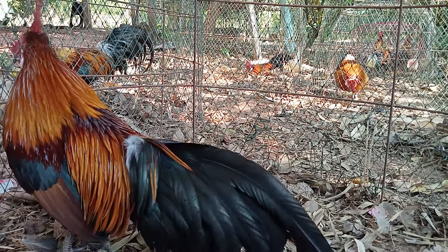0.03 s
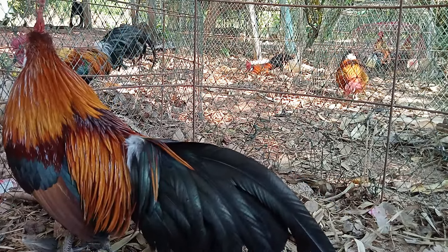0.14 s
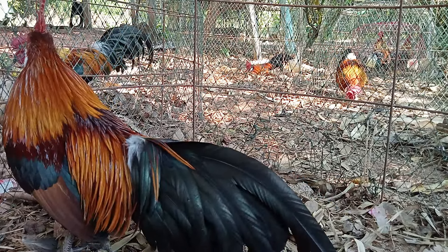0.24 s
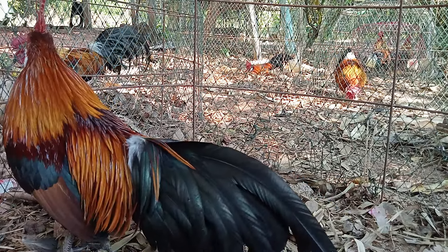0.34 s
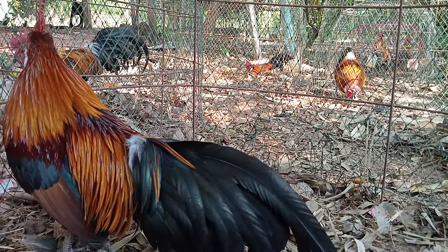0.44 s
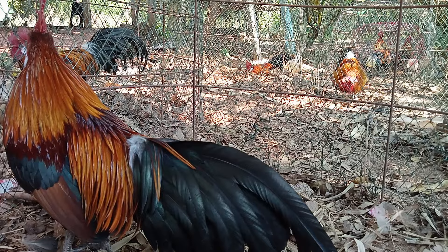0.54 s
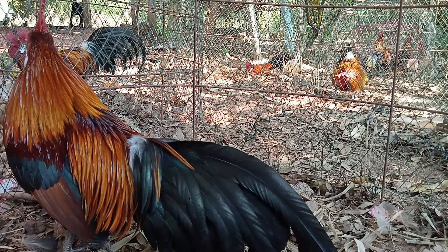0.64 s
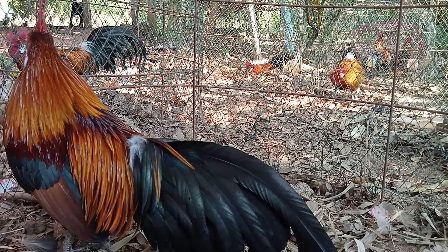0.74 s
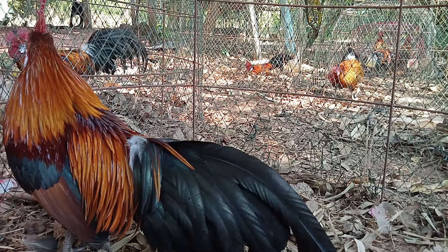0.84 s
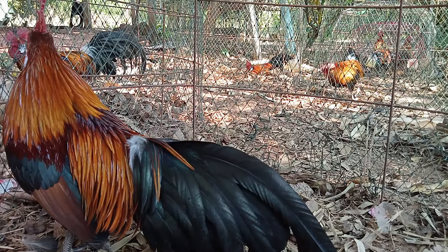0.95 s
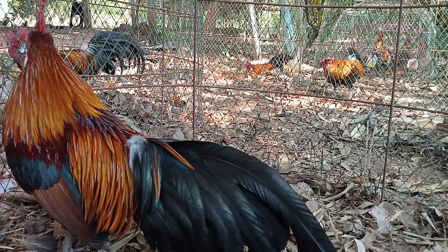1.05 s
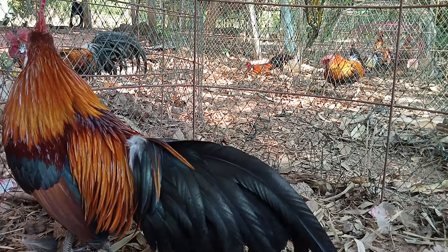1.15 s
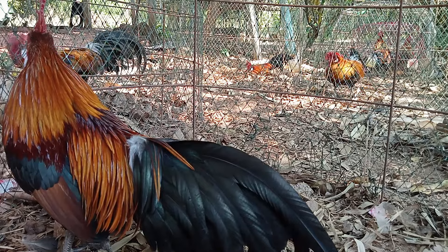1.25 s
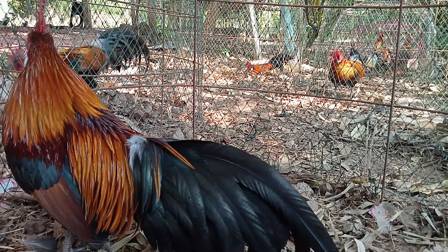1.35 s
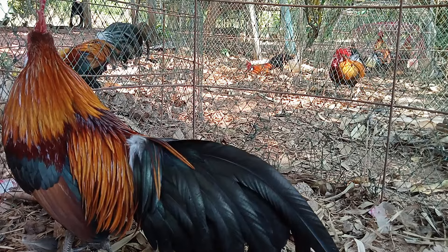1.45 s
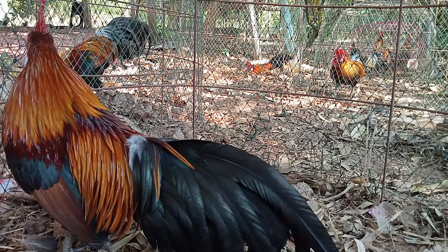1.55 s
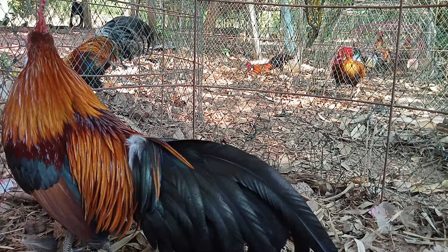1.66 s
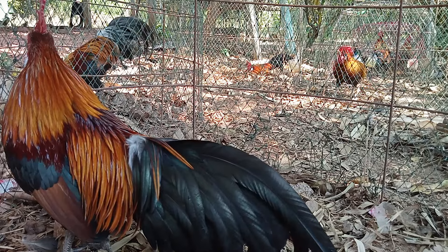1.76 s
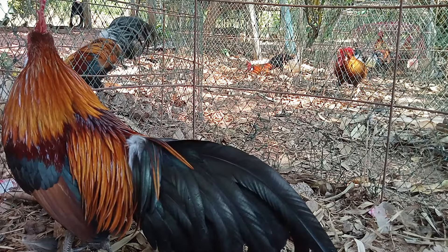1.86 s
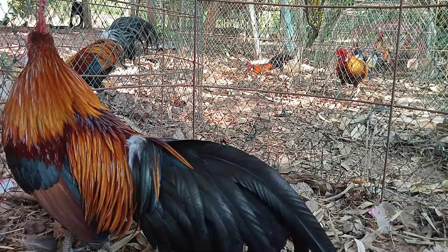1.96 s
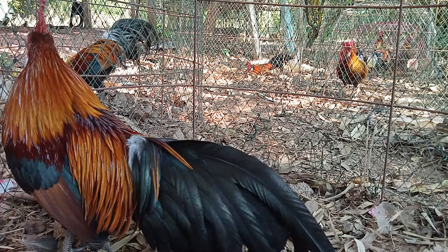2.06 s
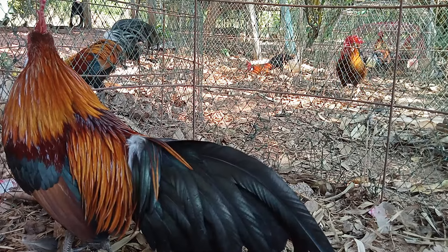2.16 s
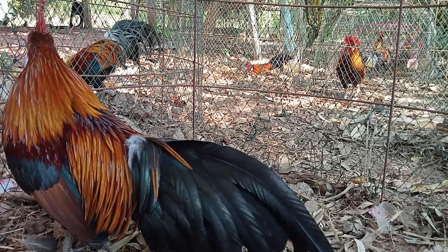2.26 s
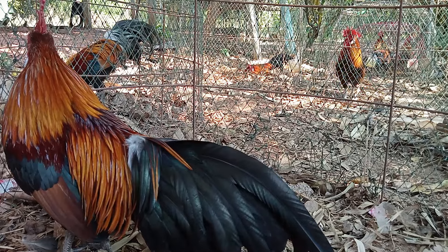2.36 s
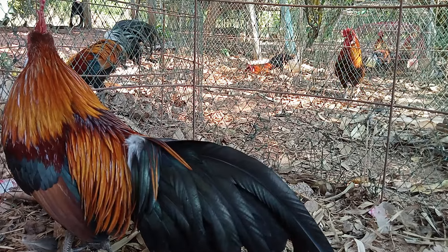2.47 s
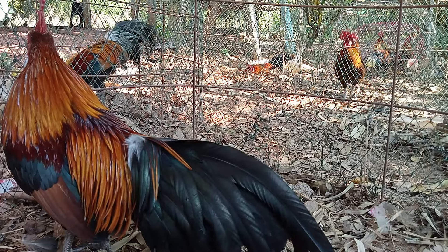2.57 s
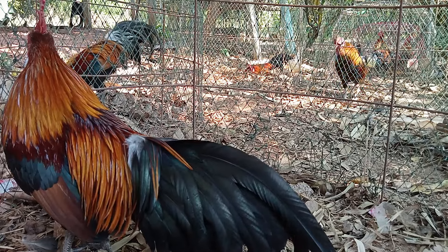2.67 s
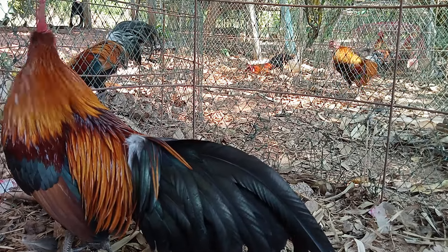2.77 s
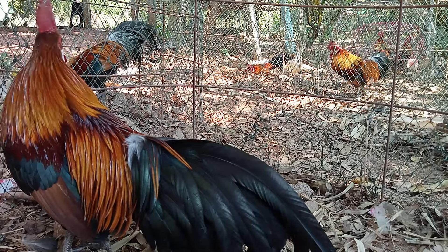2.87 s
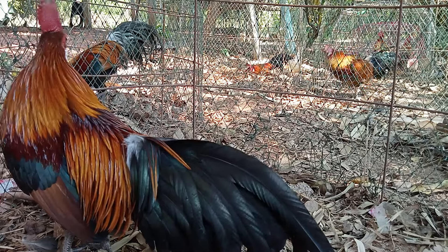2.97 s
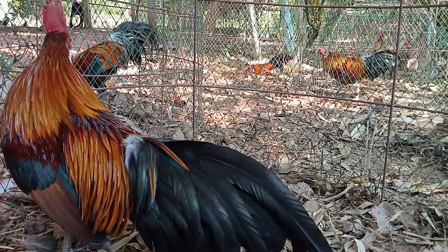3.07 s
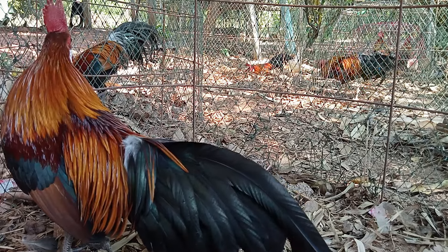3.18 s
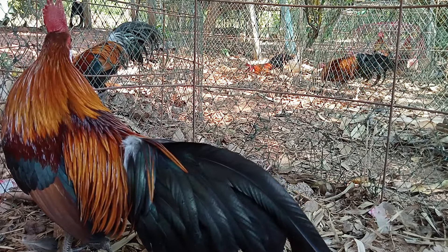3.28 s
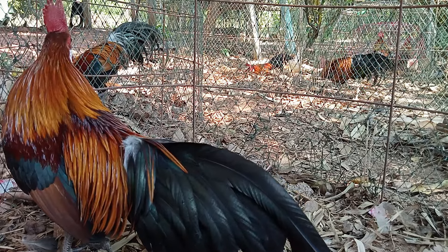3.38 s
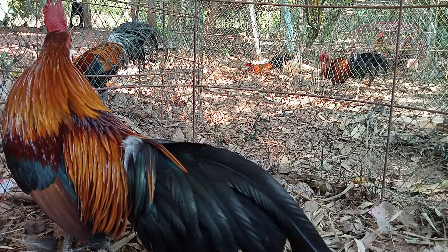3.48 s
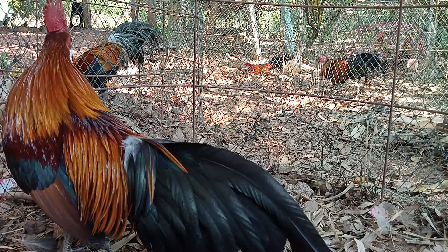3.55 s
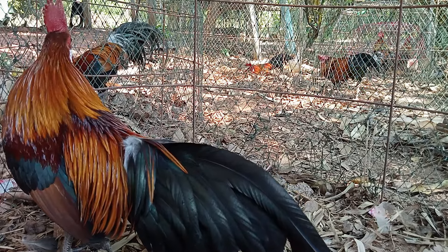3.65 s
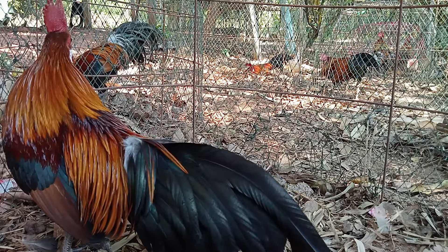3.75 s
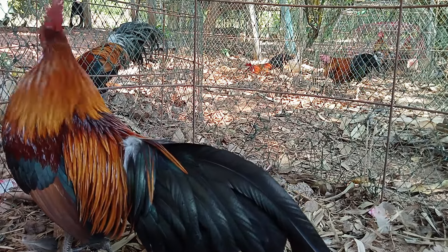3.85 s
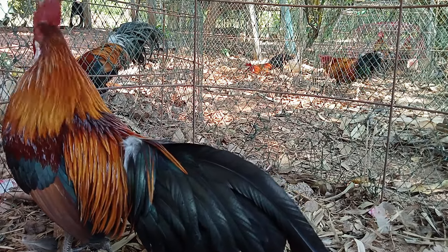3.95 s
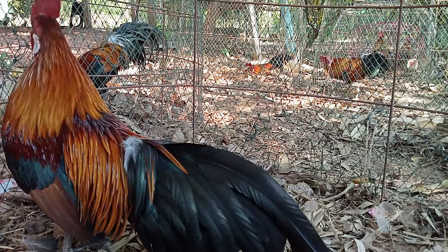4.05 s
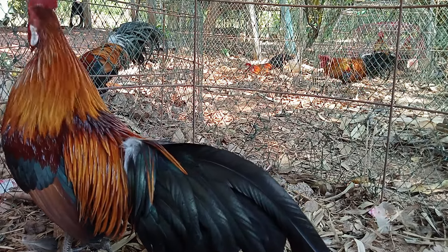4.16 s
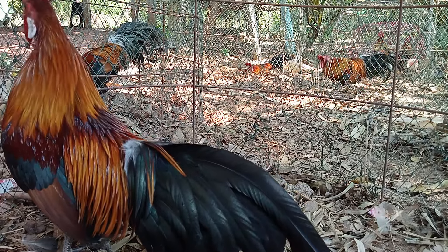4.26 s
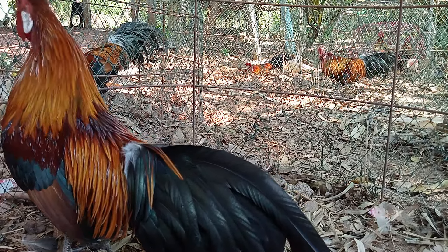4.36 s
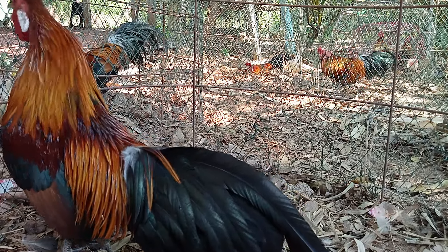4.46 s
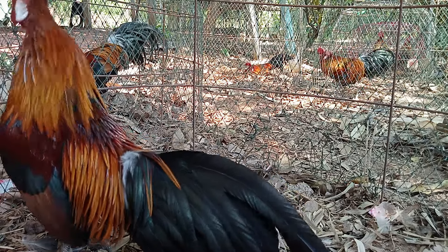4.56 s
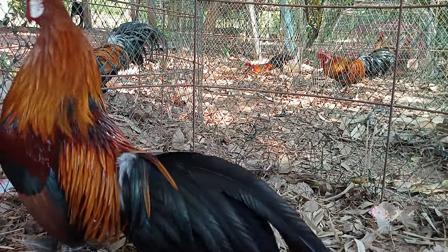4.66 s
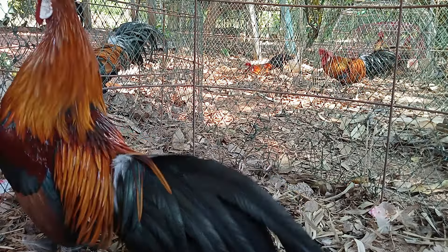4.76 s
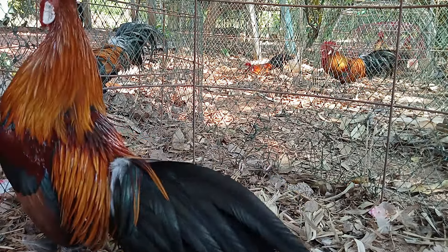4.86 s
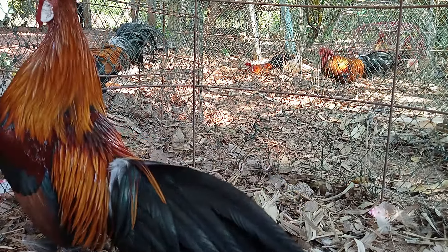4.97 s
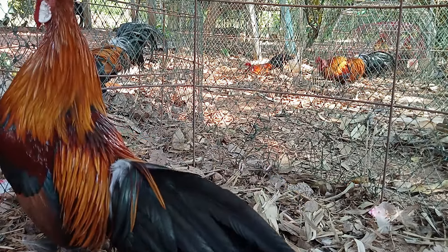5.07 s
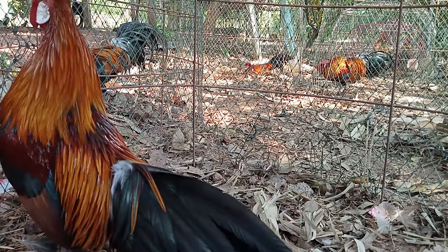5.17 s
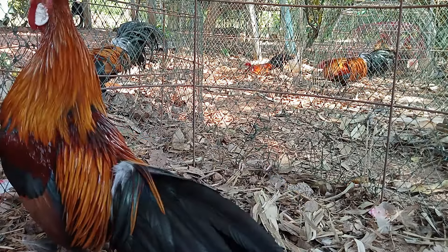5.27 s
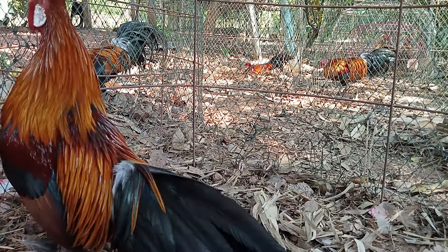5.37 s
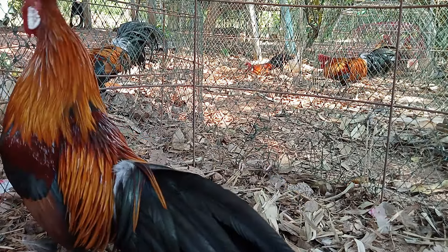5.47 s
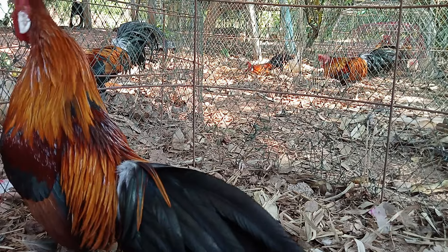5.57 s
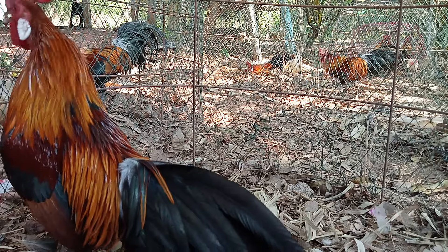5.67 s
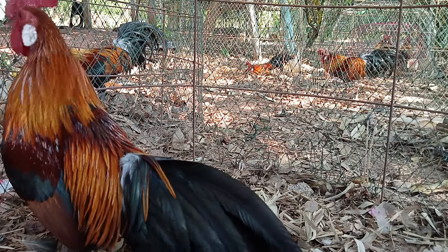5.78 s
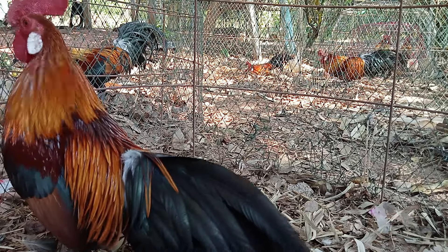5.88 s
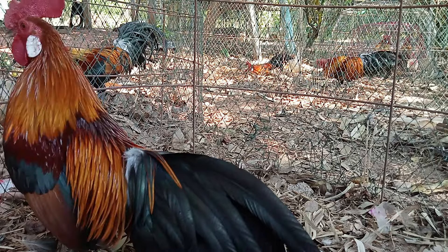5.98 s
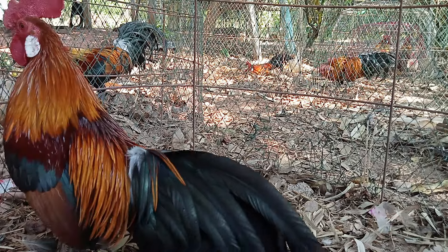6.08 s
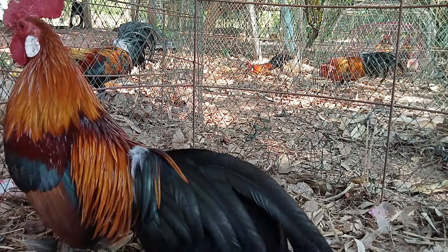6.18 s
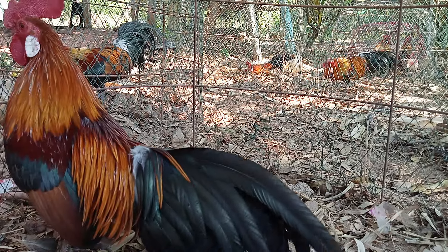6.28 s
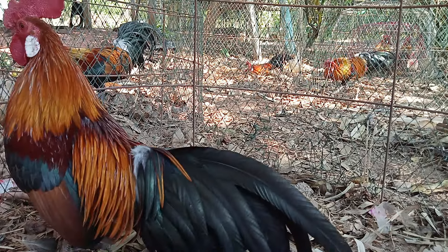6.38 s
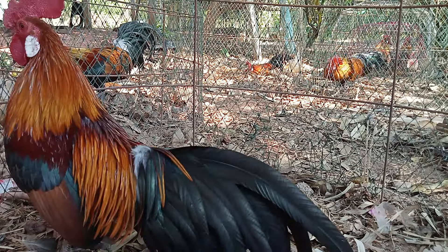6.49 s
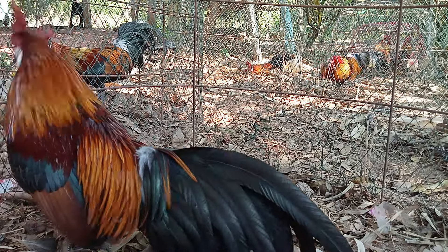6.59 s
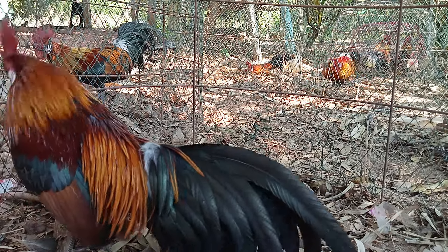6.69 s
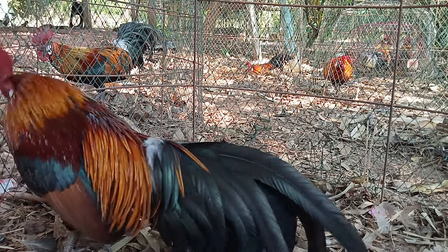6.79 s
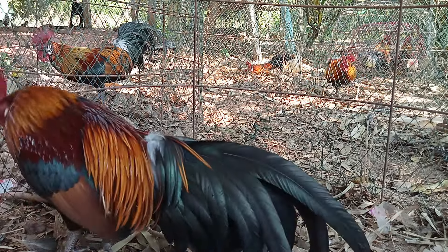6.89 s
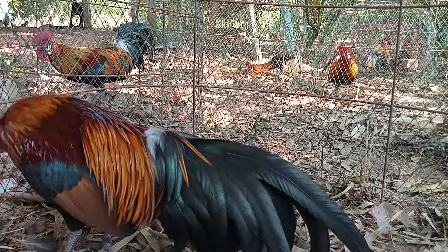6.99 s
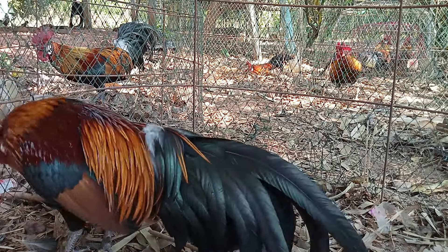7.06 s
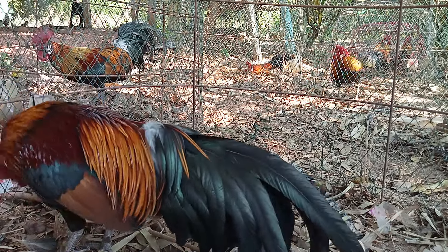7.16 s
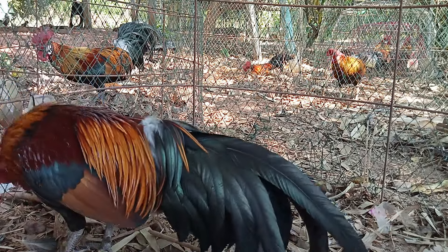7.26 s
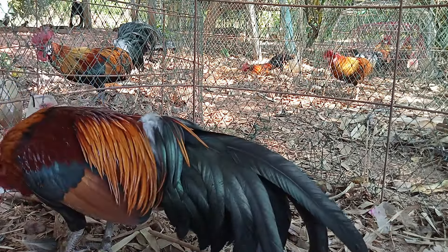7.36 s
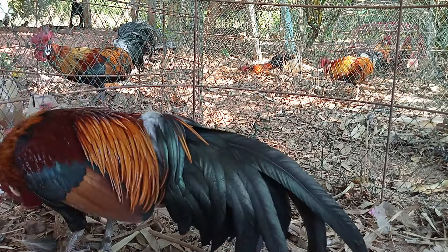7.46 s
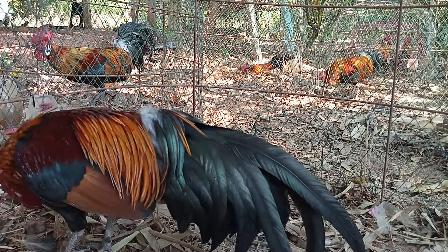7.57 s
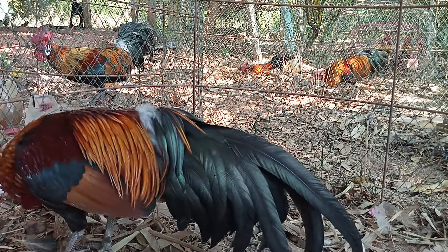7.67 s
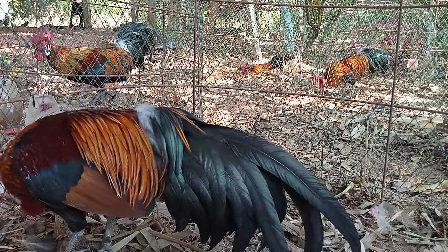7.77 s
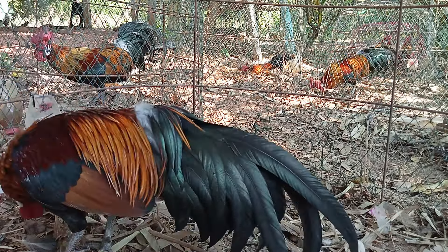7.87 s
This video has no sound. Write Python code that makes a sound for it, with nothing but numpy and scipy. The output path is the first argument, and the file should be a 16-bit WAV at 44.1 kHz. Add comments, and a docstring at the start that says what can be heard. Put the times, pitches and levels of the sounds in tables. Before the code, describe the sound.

Low throaty clucks quicken before one harsh, close rooster crow, followed by a rattling growl, with insects buzzing and wild birds whistling behind.

```python
"""A wire pen under trees: a rooster crows once, close by, as two wavering membranes and a rasp in a moving throat.
Around it other roosters cluck, moan and growl softly, as voiced notes shaped by throat resonances.
Further off wild birds whistle in pure glides and chatter in pulsed notes; insects, as coloured noise,
buzz steadily near 7 kHz. Dry leaves crack in short bursts, and light air bumps the microphone."""
import sys
import numpy as np
from scipy import signal
from scipy.fft import rfft, irfft, next_fast_len
from scipy.io import wavfile
from scipy.ndimage import uniform_filter1d

SR = 44100
rng = np.random.default_rng(int(sys.argv[2]) if len(sys.argv) > 2 else 0)


def unload_audio(sound):
    """Save the sound as a 16-bit wav file, at the path given as the first command line argument."""
    columns = np.transpose(np.atleast_2d(sound))
    # keep every value between -1 and 1, then stretch to whole-number steps
    steps = np.round(np.clip(columns, -1, 1) * 32767)
    wavfile.write(sys.argv[1], SR, steps.astype(np.int16))


N = 349713
TIME = np.arange(N) / SR


def undb(db):
    """Decibels to amplitude gain."""
    return 10 ** (np.asarray(db) / 20)


def curves(table):
    """Each column after the time column, as a control line through time."""
    times_s, *columns = np.transpose(table)
    return [np.interp(TIME, times_s, column) for column in columns]


def gate(table, fade_s):
    """Open from the first row of a table to its last, with straight fades."""
    inside_s = np.minimum(TIME - table[0][0], table[-1][0] - TIME)
    return np.clip(inside_s / fade_s + .5, 0, 1)


def unit(x):
    """Scale to rms 1."""
    return x / np.sqrt(np.mean(x ** 2) + 1e-18)


def even(x, size):
    """Hold the short-term rms near 1; size is the averaging length in samples."""
    power = uniform_filter1d(uniform_filter1d(x ** 2, size), size)
    return x / np.sqrt(np.abs(power) + 1e-12)


def colour(x, spectrum):
    """Filter by a (pitch_hz, level_db) spectrum that falls away past its ends."""
    hz, db = np.transpose(spectrum)
    size = next_fast_len(len(x))
    f = np.arange(size // 2 + 1) * SR / size + 1
    gain = undb(np.interp(np.log(f), np.log(hz), db))
    gain = gain / np.hypot(1, (.7 * hz[0] / f) ** 4)
    gain = gain / np.hypot(1, (f / hz[-1] * .7) ** 4)
    return irfft(rfft(x, size) * gain, size)[:len(x)]


def band(x, lo_hz, hi_hz, order=2):
    """Band-pass; order 1 is a single resonance."""
    edges_hz = [max(lo_hz, 10), min(hi_hz, SR * .45)]
    return signal.sosfilt(signal.butter(order, edges_hz, "band", fs=SR, output="sos"), x)


def walk(rate_hz, size=N):
    """Smooth chance: random points, rate_hz of them a second, joined by straight lines."""
    steps = np.arange(size) * rate_hz / SR
    count = int(steps[-1]) + 2
    return 1.2 * np.interp(steps, np.arange(count), rng.standard_normal(count))


def pulses(hz, rough, jitter=0.36, scatter_db=4):
    """One push of air per cycle; roughness scatters their moments and sizes."""
    at = np.flatnonzero(np.diff(np.floor(np.cumsum(hz) / SR)))
    chance = rng.standard_normal((len(at), 2)).T * (rough * np.ones(len(hz)))[at]
    moved = np.clip(at + jitter * chance[0] * SR / hz[at], 0, len(hz) - 1).astype(int)
    return np.bincount(moved, undb(scatter_db * chance[1]), len(hz))


def add(track, start_s, sound):
    """Mix a sound into a track at a time."""
    i = max(int(start_s * SR), 0)
    track[i:i + len(sound)] += sound[:N - i]


def bursts(table, texture):
    """Rounded bursts, one per (start_s, length_s, level_db), opening onto a steady texture."""
    envelope = np.zeros(N)
    for start_s, length_s, level_db in table:
        add(envelope, start_s, undb(level_db) * np.sqrt(np.abs(np.hanning(int(length_s * SR)))))
    return envelope * unit(texture)


# still air under the trees, as the microphone hears it: pitch_hz, relative level_db
AIR_SPECTRUM = [(88, -42), (150, -10.5), (436, -6), (509, -4), (607, -3), (681, -5), (1980, -9.5),
                (5540, -8), (7130, -6.5), (10100, -27), (15500, -14)]
# insects all around: time_s, level_db (trimmed by insect_db)
INSECT_LEVELS = [(0, -48), (4.4, -49), (5.7, -49.5), (6.3, -52.5), (7.9, -54)]
# colour of the insect chorus: pitch_hz, relative level_db
INSECT_SPECTRUM = [(4500, -26), (5800, -10.5), (6600, -5), (7100, 0.5), (7700, -5.5), (8400, -15.5),
                   (10000, -22)]


def woodland(air_db=-51, insect_db=-2):
    """Still air and a chorus of insects are shaped noise; the insects have a fine flutter."""
    air = unit(colour(rng.standard_normal(N), AIR_SPECTRUM)) * undb(air_db + .5 * walk(3.83))
    buzz = unit(colour(rng.standard_normal(N), INSECT_SPECTRUM))
    flutter = undb(1.5 * walk(180) + .5 * walk(18))
    return air + buzz * flutter * undb(curves(INSECT_LEVELS)[0] + insect_db)


# air rumbling at the microphone: time_s, level_db (trimmed by rumble_db)
RUMBLE_LEVELS = [(.5, -60), (.9, -46.5), (1.7, -62), (3, -62.5), (3.7, -70.5), (4.8, -63.5), (5.2, -43),
                 (5.7, -46.5), (5.9, -39), (7, -44.5), (7.9, -56)]
# colour of that rumble: pitch_hz, relative level_db
RUMBLE_SPECTRUM = [(25, -63), (60, -1.5), (110, -2), (180, -11), (300, -16), (500, -73.5)]
# strongest bumps of air on the microphone: start_s, peak level_db (before ringing and bump_db), pitch_hz
AIR_BUMPS = [(0.122, -35, 80.5), (0.902, -21, 125), (1.132, -35, 100), (1.421, -27.5, 84),
             (2.248, -34.5, 105), (3.072, -42, 75), (4.269, -41, 74), (5.82, -15.5, 149.6),
             (5.955, -29, 83.3), (6.115, -17, 102), (6.15, -25, 106), (6.409, -27.5, 113),
             (6.618, -22.5, 96), (6.718, -28, 139), (6.88, -29, 98), (7.149, -29.5, 101)]


def buffeting(rumble_db=-3, bump_db=-1, rise_s=0.005, patchy_db=7):
    """Air eddies at the microphone: a patchy noise rumble with single low, dying bumps."""
    rumble = even(colour(rng.standard_normal(N), RUMBLE_SPECTRUM), size=3000)
    out = rumble * undb(curves(RUMBLE_LEVELS)[0] + rumble_db + patchy_db * walk(21))
    t = np.arange(SR // 10) / SR
    push = t / rise_s * np.exp(1 - t / rise_s)  # peaks at rise_s, then dies away
    for start_s, level_db, pitch_hz in AIR_BUMPS:
        add(out, start_s, undb(level_db + bump_db) * push * np.sin(2 * np.pi * pitch_hz * t))
    return out


# runs of harsh notes from a far bird: start_s, count of notes, note length_s, level_db
CHATTER_RUNS = [(0.032, 4, 0.093, -45.5), (7.576, 1, 0.43, -57)]
# colour of the far bird's voice: pitch_hz, relative level_db
CHATTER_SPECTRUM = [(1250, -10.5), (1620, 9), (1830, 8), (2150, 0.5), (2900, -14), (3350, -5), (3800, -50)]


def chatter(period_s=0.1565, pulse_hz=260.0):
    """Evenly spaced notes open onto a coloured, slightly irregular train of pulses."""
    notes = []
    for start_s, count, length_s, level_db in CHATTER_RUNS:
        for i in range(count):
            notes.append((start_s + i * period_s, length_s, level_db))
    return bursts(notes, colour(pulses(np.full(N, pulse_hz), .25), CHATTER_SPECTRUM))


# feet in dry leaves: start_s, length_s, level_db
LEAF_RUSTLES = [(.1, 0.079, -49), (1.02, 0.21, -51), (1.53, 0.055, -50.5), (6.4, .06, -54)]
# a peck at the ground: start_s, length_s, level_db
GROUND_PECK = [(7.141, 0.021, -39)]


def leaves():
    """Dense, tiny cracks of uneven size make the dry leaves and, in a lower band, one peck."""
    cracks = rng.standard_normal(N) * (rng.random(N) < .2) * undb(2 * rng.exponential(size=N))
    rustles = bursts(LEAF_RUSTLES, band(cracks, 1200, 8600, order=1))
    return rustles + bursts(GROUND_PECK, band(cracks, 580, 2150))


# clucks of the near roosters: start_s, peak level_db, throat resonance_hz (before arch and droop),
# upper resonance level_db relative to the throat's
CLUCK_NOTES = [(.112, -31, 353, -17), (.708, -35.5, 545, -5), (.826, -43.5, 426, -29),
               (.94, -41.5, 440, -3), (1.108, -31, 510, -2), (1.212, -44.5, 520, -24),
               (1.31, -40.5, 556, -30), (1.397, -40, 510, -26), (1.481, -38, 410, -2), (1.6, -37, 680, -28),
               (2.235, -43, 616, -11), (2.344, -30.5, 320, -24), (2.397, -40.5, 730, 0),
               (2.473, -30.5, 345, -10), (2.548, -28, 570, -41), (2.574, -28.5, 576, -6.5),
               (2.704, -27.5, 584, -33), (2.769, -30, 530, -16), (2.865, -28, 530, -20),
               (2.988, -26, 465, -19), (3.115, -27.5, 430, -9), (3.238, -30, 480, -30),
               (3.335, -29, 433, -9.5), (3.445, -25.5, 454, -13), (3.58, -24.5, 493, -6.5),
               (3.705, -31.5, 590, -17), (3.865, -36, 450, 17), (4.003, -24.5, 460, -2),
               (4.132, -28.5, 586, -37), (4.25, -28, 400, -7), (5.815, -29, 326, -12),
               (7.146, -39.5, 448, -1), (7.211, -40, 584, -21), (7.42, -32, 338, -24),
               (7.472, -36, 513, -27), (7.59, -36.5, 447, 28), (7.728, -27, 447, -8),
               (7.905, -37.5, 535, -5)]


def clucks(crest_s=0.011, swell_s=0.015, fade_s=.021, pulse_hz=185, arch=0.1626, droop_per_s=4,
           width_hz=200, upper_hz=950, upper_width_hz=380, top_hz=1520):
    """Short voiced notes; pitch and throat resonance arch with the push of air and droop."""
    out = np.zeros(N)
    t = np.arange(-SR // 20, SR // 20) / SR  # zero at the crest of the note
    push = 1 / (1 + (t / np.where(t < 0, swell_s, fade_s)) ** 2) ** 1.64 * np.hanning(len(t))
    lift = (1 + arch * (push - .8)) * np.exp(-droop_per_s * t)
    k = np.arange(2, 11)[:, None]  # harmonic numbers
    for start_s, level_db, throat_hz, upper_db in CLUCK_NOTES:
        waver = 1 + 0.0952 * walk(294.0, size=len(t))
        pitch = pulse_hz * undb(rng.standard_normal()) * lift * waver
        throat = 1 / (1 + 2j * (k * pitch - throat_hz * lift) / width_hz)
        upper = undb(upper_db) / (1 + 2j * (k * pitch - upper_hz * lift) / upper_width_hz)
        dulling = np.hypot(1, (k * pitch / top_hz) ** 4)
        # each harmonic starts at a random phase, which softens the pulses
        partials = np.exp(2j * np.pi * (k * np.cumsum(pitch) / SR + rng.random(k.shape)))
        note = push * ((throat - upper) / dulling * partials).real.sum(axis=0)
        add(out, start_s + crest_s + t[0], note / np.abs(note).max() * undb(level_db))
    return out


def whistles(table, bend, crest, hook_hz, tail, flutter_db=3):
    """Pure glides: bend curves the sweep, the hook kinks it; loudest at share crest, tail near the end."""
    out = np.zeros(N)
    for start_s, length_s, start_hz, end_hz, level_db in table:
        u = np.linspace(0, 1, int(length_s * SR))
        hz = start_hz + (end_hz - start_hz) * u ** bend + hook_hz * np.sin(3 * np.pi * u)
        hz = hz * (1 + 0.0059 * walk(250.0, size=len(u)))
        swell = np.interp(u, [0, crest, .93, 1], [.1, 1, tail, 0])
        gain = undb(level_db + flutter_db * walk(62.2, size=len(u)))
        add(out, start_s, gain * swell * np.sin(2 * np.pi * np.cumsum(hz) / SR))
    return out


# falling whistles, further off: start_s, length_s, start pitch_hz, end pitch_hz, level_db
FALLING_NOTES = [(.245, .12, 5280, 2210, -51), (.515, .15, 5130, 2120, -48.5), (.7, 0.098, 4630, 3600, -58),
                 (.86, 0.15, 5450, 2010, -43.5), (1.26, 0.14, 5300, 1990, -46),
                 (1.62, .13, 5400, 2870, -56), (1.7, .15, 5030, 2220, -44.5),
                 (2.09, 0.11, 5100, 2700, -42.5), (2.34, .12, 5510, 2040, -43.5),
                 (2.97, 0.1, 4430, 3000, -55), (3.288, .077, 5080, 2960, -46),
                 (3.39, .095, 3960, 3350, -55), (3.522, 0.077, 5250, 2970, -47.5),
                 (7.74, 0.083, 4770, 2660, -55)]


def falling_whistles():
    """Glides that swell quickly, hold their level and sweep down."""
    return whistles(FALLING_NOTES, bend=1.5, crest=0.1, hook_hz=182, tail=0.99)


# rising whistles, further off: start_s, level_db
RISING_NOTES = [(0.269, -37.5), (1.336, -39), (2.635, -37.5), (6.02, -41), (7.26, -40)]


def rising_whistles(length_s=.16, start_hz=3310, end_hz=5086):
    """Glides of one shape that swell as they sweep up."""
    notes = [(start_s, length_s, start_hz, end_hz, level_db) for start_s, level_db in RISING_NOTES]
    return whistles(notes, bend=.65, crest=0.6, hook_hz=10, tail=0.86)


def drawn_out_voice(pitch, levels, throat):
    """A train of rough pulses through (pitch_hz, width_hz, level_db) throat resonances."""
    source = pulses(*curves(pitch), jitter=0.242, scatter_db=5.0)
    voice = np.zeros(N)
    for hz, width_hz, db in throat:
        voice += undb(db) * band(source, hz - width_hz / 2, hz + width_hz / 2, order=1)
    voice = even(band(voice, 188, 1000, order=3), size=1500)
    return voice * undb(curves(levels)[0]) * gate(levels, fade_s=0.027)


# a low moan near the microphone: time_s, level_db
MOAN_LEVELS = [(1.63, -58), (1.8, -52), (2.02, -53.5), (2.13, -59.5)]
# pulses of the moan: time_s, pulse rate_hz, roughness 0-1
MOAN_PULSES = [(1.63, 236.4, 0.24), (1.77, 207.2, 0.12), (1.98, 195.6, 0.19), (2.08, 220.3, 0.23)]


def moan():
    """Fairly regular pulses excite two narrow throat resonances and a broad low one."""
    return drawn_out_voice(MOAN_PULSES, MOAN_LEVELS, [(378, 260, 10), (617, 48, 0.0), (750, 20, 17.5)])


def membrane(hz, rough, waver=0.013, tremor=0.00201, slope=0.39, count=11):
    """One vibrating side of the syrinx; roughness throws flutter sidebands around each harmonic."""
    wavering_hz = hz * (1 + (tremor + waver * rough) * walk(450))
    turn = np.exp(2j * np.pi * np.cumsum(wavering_hz) / SR)
    partial, out = 1, 0
    for k in range(1, count + 1):
        partial = partial * turn
        out = out + partial.real / k ** slope * undb(2 * walk(40)) * (1 + rough * walk(500))
    return unit(out)


# syllables of the close crow: start_s, end_s, attack_s, release_s, start effort_db, end effort_db
CROW_SYLLABLES = [(4.403, 4.579, 0.013, 0.048, 4, -2), (4.565, 4.829, 0.013, 0.072, 0, 3),
                  (4.826, 5.605, 0.03, 0.026, 2, -3.5), (5.601, 5.761, 0.026, 0.031, -5.5, -0.5)]


def effort(growth):
    """Each syllable has an attack, a steady swell or sag, and a release."""
    out = np.zeros(N)
    for start_s, end_s, attack_s, release_s, start_db, end_db in CROW_SYLLABLES:
        t = np.arange(int((end_s - start_s) * SR)) / SR
        edges = np.minimum(np.minimum(t / attack_s, t[::-1] / release_s), 1)
        add(out, start_s, edges * undb(growth * np.linspace(start_db, end_db, len(t))))
    return out


# first side of the close rooster's syrinx, one list per syllable: time_s, pitch_hz, roughness (held to 0-1)
FIRST_SIDE = [
    [(4.405, 739.5, 0.84), (4.425, 788, 0.48), (4.457, 806.6, 0.1), (4.475, 887, 0.72), (4.55, 895, 0.83)],
    [(4.572, 845, 1), (4.615, 1030, 0.64), (4.7, 976.5, 0.82), (4.728, 1007, 0.26), (4.756, 1118, 0.17),
     (4.79, 957, 0.22), (4.815, 900, 1.14)],
    [(4.838, 935, 1), (4.852, 958, 0.08), (4.878, 971.5, .1), (4.895, 968, 0.8), (4.962, 1004, .25),
     (5.1, 972, 0.78), (5.29, 939.4, .42), (5.42, 914.5, 0.94), (5.565, 925, 0.11), (5.6, 831, 0.54)],
    [(5.628, 1006, 1.09), (5.646, 1064, 0.06), (5.685, 1050, 0), (5.76, 869, 0.27)],
]
# second side of the syrinx: time_s, pitch_hz, share of the voice 0-1
SECOND_SIDE = [(4.82, 935, 0.02), (4.845, 1078, 1), (4.872, 1108, 1), (4.905, 1274, .95), (4.935, 1150, .7),
               (4.955, 1094, .05), (5.13, 1105, .25), (5.195, 1155, 0.98), (5.32, 1081, 1), (5.39, 1098, 1),
               (5.43, 812, 0.06), (5.62, 779.4, 0)]
# beak: time_s, opening 0-1
BEAK_OPENING = [(4.55, 0), (4.58, 0.68), (4.68, 0.7), (4.72, 0.92), (5.385, 0.97), (5.425, 0), (5.59, 0),
                (5.63, 0.4)]
# throat and beak half closed, then wide open: pitch_hz, relative level_db
NARROW_SPECTRUM = [(500, 5.5), (780, 8.5), (1250, 3), (1800, 12.5), (2650, 2), (3150, -11), (3850, 5),
                   (5200, -38), (5900, -31), (6600, 8), (7400, 1), (8800, -32.5), (11500, -12), (15000, -2)]
WIDE_SPECTRUM = [(550, -47), (800, -1.5), (1080, 3), (1450, -3.5), (2100, -5.5), (2650, 5.5), (3200, -28.5),
                 (4000, -9.5), (4900, -9.5), (5500, -21), (6800, -30), (7600, -34), (10000, -33),
                 (15000, -49)]
# edges of the throat bands, low to high: pitch_hz
THROAT_BAND_EDGES = [660, 1400, 3200, 5600, 10000, 16000]
# throat bands, low to high: narrow beak level_db, half open level_db, wide level_db,
# change_db when the second side sings, growth in dB per dB of effort, share of the throb 0-1
THROAT_BANDS = [(-29, -21.5, -22.5, 9.5, 1.5, 1), (-18, -19, -16, -2, 1.13, 0.14),
                (-40, -45, -21, -2, 1.5, 0.92), (-20, -27, -22, -8.5, 1.9, 0.01),
                (-41, -58.5, -42.5, -3, 2, .1)]


def crow(rasp_top_hz=8500, breakup=0.141, flicker_db=2.3, hiss_db=-15, second_rough=0.63,
         second_calms=0.13, throb_hz=32, throb_crest_s=5.326, throb_middle_s=5.345, throb_spread_s=0.13):
    """Two membranes sing against each other and break into a rasp; effort and beak shape the throat."""
    hz, rough = curves(sum(FIRST_SIDE, []))
    second_hz, share = curves(SECOND_SIDE)
    opening = curves(BEAK_OPENING)[0]
    rough = np.clip(rough * (1 + breakup * walk(110)), 0, 1)

    # as the air runs low, the second side drops out in regular throbs
    depth = np.exp(-((TIME - throb_middle_s) / throb_spread_s) ** 2)
    dip = depth * np.sin(np.pi * throb_hz * (TIME - throb_crest_s)) ** 2
    first = np.sqrt(1 - share) * membrane(hz, rough)
    second = np.sqrt(share) * (1 - dip) * membrane(second_hz, second_rough * rough)

    flap_hz = hz + share * (second_hz - hz)
    flaps = pulses(flap_hz, 0.93, jitter=.25, scatter_db=0.0) * undb(3.95 * walk(200))
    rasp = unit(band(flaps, 530, rasp_top_hz, order=1)) * (1 - second_calms * share)
    hiss = undb(hiss_db + 4.8 * walk(150)) * unit(band(rng.standard_normal(N), 6800, 14500))
    source = np.sqrt(1 - rough ** 2) * (first + second) + rough ** 2 * rasp + hiss
    voice = (1 - opening) * colour(source, NARROW_SPECTRUM) + opening * colour(source, WIDE_SPECTRUM)

    out = np.zeros(N)
    for lo_hz, hi_hz, settings in zip(THROAT_BAND_EDGES, THROAT_BAND_EDGES[1:], THROAT_BANDS):
        narrow_db, half_db, wide_db, second_db, growth, sway = settings
        db = np.interp(opening, [0, .5, 1], [narrow_db, half_db, wide_db])
        db = db + share * second_db + flicker_db * rough * walk(80)
        level_voice = even(band(voice, lo_hz, hi_hz, order=5), size=400)
        out += level_voice * undb(db) * effort(growth) * (1 - sway * dip)
    return out


# a rattling growl near the microphone: time_s, level_db
GROWL_LEVELS = [(5.999, -49.5), (6.25, -44), (6.5, -44), (6.88, -43.5), (6.935, -62), (6.98, -42),
                (7.027, -62), (7.062, -37), (7.09, -64)]
# pulses of the growl: time_s, pulse rate_hz, roughness 0-1
GROWL_PULSES = [(6.0, 169.1, .8), (6.25, 199, .5), (6.38, 171.9, .6), (6.5, 201.9, 0.54),
                (6.87, 158.2, 0.46), (6.9, 334, 0.12), (6.97, 203.3, 0.698), (7.02, 197, 0.42),
                (7.045, 342, 0.065)]


def growl():
    """Rough, uneven pulses rattle through three broad throat resonances."""
    return drawn_out_voice(GROWL_PULSES, GROWL_LEVELS, [(382, 185, 0.9), (670, 150, 0.82), (1016, 480, -1.1)])


def trees(x, wet_db, t60_s, top_hz):
    """Trunks and foliage scatter a thin, dull tail of decaying noise."""
    t = np.arange(SR) / SR
    decay = undb(-60 * t / t60_s) * (1 - np.exp(-t / 0.0011))
    tail = band(rng.standard_normal(SR), 390, top_hz) * decay
    return x + undb(wet_db) * signal.fftconvolve(x, tail / np.linalg.norm(tail))[:N]


def scene():
    """Roosters near the microphone, wild birds far, insects all around."""
    far_chatter = trees(chatter(), wet_db=0.5, t60_s=0.5, top_hz=3850)
    soft = trees(clucks() + moan() + growl(), wet_db=-15, t60_s=0.13, top_hz=2030)
    far_whistles = trees(falling_whistles() + rising_whistles(), wet_db=-8.5, t60_s=0.37, top_hz=7040)
    loud = trees(undb(5.5) * crow(), wet_db=-21.0, t60_s=0.78, top_hz=6840)
    return (woodland() + buffeting() + far_chatter + leaves() + soft + far_whistles + loud)[None]


def record(dry, duck_db=5.5, duck_above_db=-13.5, hold_s=0.17, recover_s=0.052, top_hz=15650):
    """The recorder lowers its gain while loud, holds, recovers, rounds the highest peaks and cuts the top."""
    loud = uniform_filter1d(dry[0] ** 2, size=200) > undb(duck_above_db) ** 2
    since_loud_s = TIME - np.maximum.accumulate(np.where(loud, TIME, -np.inf))
    duck = np.exp(-np.maximum(since_loud_s - hold_s, 0) / recover_s)
    out = dry * undb(-duck_db * duck)
    out = out / (1 + out ** 8) ** .125
    return signal.sosfilt(signal.ellip(10, .2, 80, top_hz, fs=SR, output="sos"), out)


dry = scene()
out = record(dry)
unload_audio(out)
```